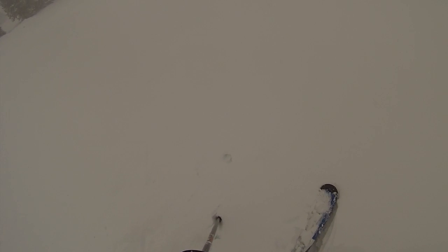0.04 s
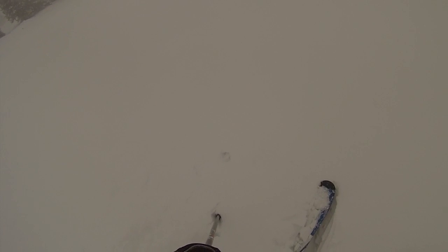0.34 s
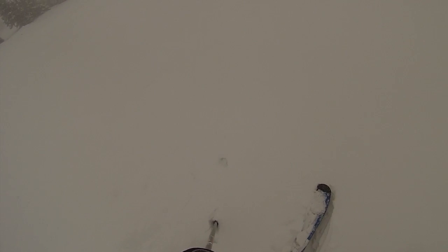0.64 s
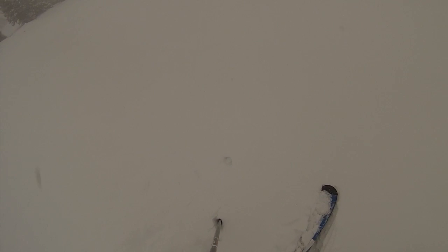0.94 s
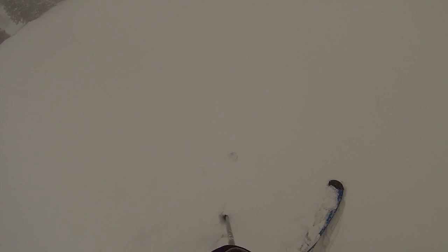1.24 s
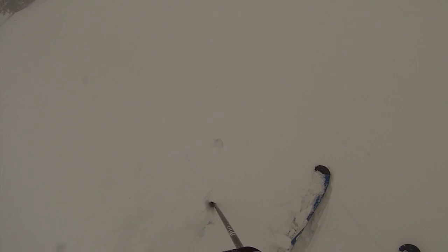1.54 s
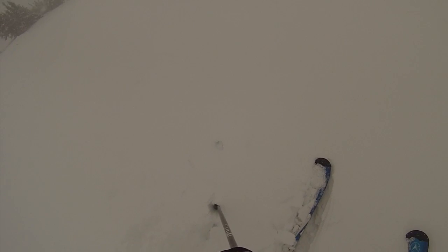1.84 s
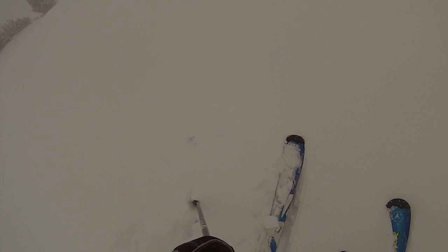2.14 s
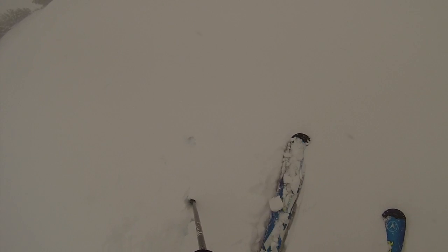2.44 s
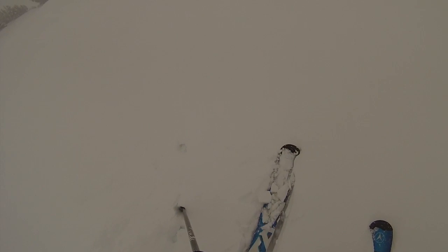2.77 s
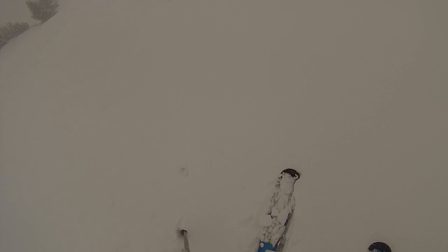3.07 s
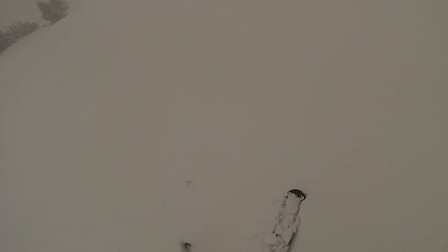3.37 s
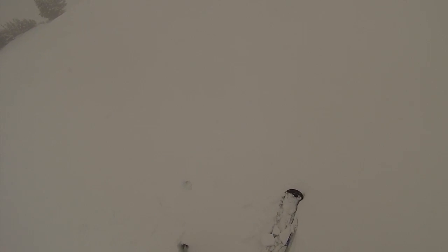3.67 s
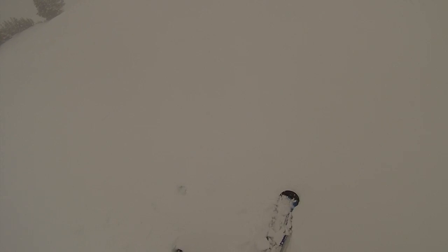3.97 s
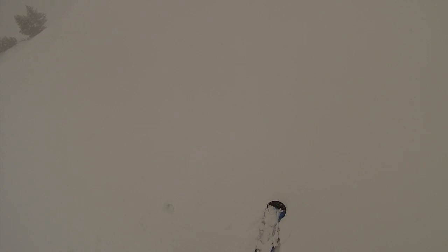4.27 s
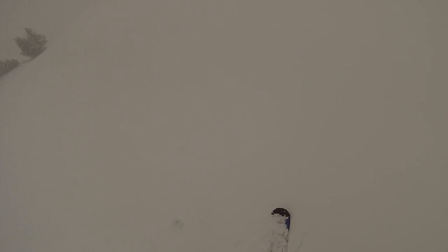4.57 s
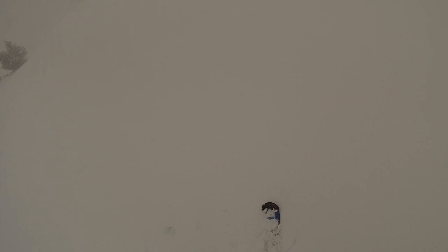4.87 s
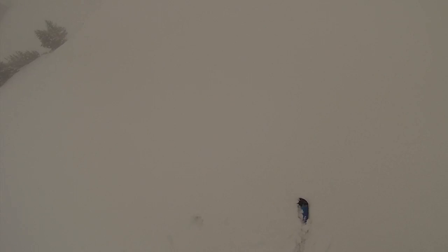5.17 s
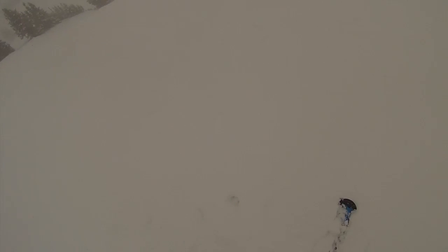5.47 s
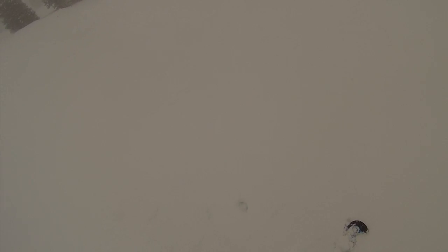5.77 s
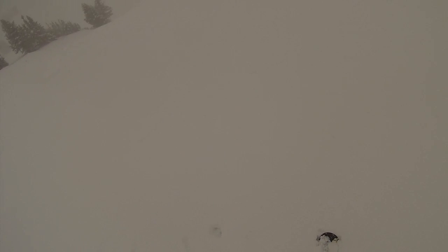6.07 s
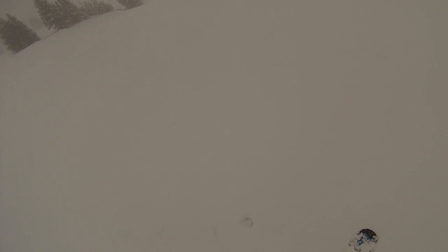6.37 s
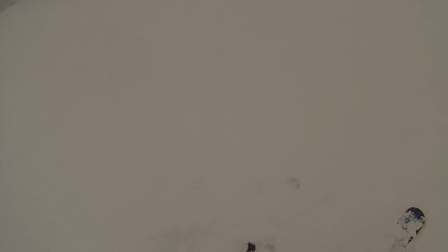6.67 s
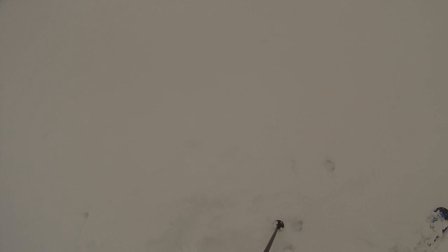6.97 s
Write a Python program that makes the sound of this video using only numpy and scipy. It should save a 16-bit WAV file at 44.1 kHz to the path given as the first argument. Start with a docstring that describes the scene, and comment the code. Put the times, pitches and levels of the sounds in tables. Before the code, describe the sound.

Low wind rumble and sharp little ticks on a body-worn camera, over the soft, muffled rush of skis turning in powder.

```python
"""A soft rush of skis in deep powder, swelling in each turn, heard from a body-worn camera's closed case.
The snow sounds through the case's resonances; grains tick on the shell and gear knocks against it.
Wind rumbles on the case; bumps in the run push it and set its mount ringing. A soft hiss lies behind.
All mono, except for the faint self-noise of the two microphones."""
import sys
import numpy as np
from scipy import signal
from scipy.fft import rfft, irfft
from scipy.io import wavfile
from scipy.ndimage import uniform_filter1d

SR = 44100
rng = np.random.default_rng(int(sys.argv[2]) if len(sys.argv) > 2 else 0)


def int16_out(signal):
    """Quantize to a 16-bit WAV file."""
    q = np.round(np.clip(np.atleast_2d(signal).T, -1, 1) * 32767)
    wavfile.write(sys.argv[1], SR, q.astype(np.int16))


N = 313992

# air stream on the case: t/s, rumble/dB, mount shake/dB
AIR_STREAM = [(0, -55.5, -70), (.22, -45, -60), (.4, -59, -69.5), (.65, -46, -73), (.92, -51, -66.5),
              (1.45, -49, -58), (1.75, -43, -72.5), (2.2, -49, -64.5), (2.85, -55, -67.5),
              (3.3, -51.5, -65.5), (3.55, -51.5, -64), (3.76, -46, -60), (4.05, -46.5, -60),
              (4.38, -52, -55.5), (4.55, -36.5, -63.5), (4.65, -42.5, -56.5), (4.78, -41, -53),
              (4.93, -46.5, -54.5), (5.15, -40, -62), (5.3, -45.5, -62), (5.56, -44, -53),
              (5.8, -53.5, -58.5), (6.1, -47.5, -69.5), (6.28, -49.5, -58), (7.12, -50, -63.5)]
# a weighted ski swishes through powder: t/s, length/s, level/dB, brightness/(dB/octave)
SKI_SWISHES = [(1.085, 0.23, -64, 12), (1.272, 0.3, -65, -11), (1.72, 0.3, -69, 11), (2.508, 0.42, -71, 10),
               (3.254, 0.21, -66.5, 10), (3.455, 0.16, -63, 13), (3.613, 0.24, -66, 28),
               (4.028, 0.37, -71, -3), (4.285, 0.15, -64.5, 26), (4.454, 0.395, -64.5, -4),
               (4.92, 0.26, -64, 11), (5.274, 0.29, -69, -2), (5.589, .11, -64, 13), (5.7, 0.21, -66.5, 11),
               (6.3, 0.37, -67, -8), (6.977, 0.3, -65.5, -26)]
# case resonances rung by spray: f/Hz, width/Hz, gain/dB
SPRAY_RESONANCES = [(2180, 210, -6), (2320, 1170, -14.5), (885, 280, -26)]


def skis(spray_trim_db=-3.0, plough_trim_db=-4.0, speed_follow=0.15):
    """Snow glides, sprays, is ploughed and packs under the skis, coloured by the case."""
    # heaps shoved aside: t/s, length/s, level/dB
    heaps = [(1.57, 0.22, -68.5), (1.95, 0.08, -62.5), (3.05, 0.3, -63.5), (4.38, 0.24, -62),
             (4.63, 0.16, -63), (4.96, 0.237, -60), (5.7, 0.31, -65), (6.2, 0.42, -65)]
    # snow packing under a ski: t/s, length/s, level/dB
    packs = [(3.69, 0.086, -67.5), (3.78, 0.12, -68), (4.42, 0.18, -72.5), (4.96, 0.26, -84)]
    # case resonances rung by ploughing: f/Hz, width/Hz, gain/dB
    plough_modes = [(195.6, 124, 3.5), (378, 49, 0), (610, 840, -11.5)]
    # resonances of packing snow: f/Hz, width/Hz, gain/dB
    pack_modes = [(910, 540, 5), (530, 240, -11.5)]
    furrow = from_db(-69.0 + speed_follow * airflow_db())
    plough_db = summed_db(furrow, arches(heaps, roundness=0.15))
    pack_db = summed_db(arches(packs, roundness=0.54))
    return (glide() + crunch(spray_db() + spray_trim_db, SPRAY_RESONANCES)
            + crunch(plough_db + plough_trim_db, plough_modes) + crunch(pack_db, pack_modes))


def glide(speed_follow=0.32, pivot_hz=1480):
    """Coasting plus a swell per swish; bright swishes favour the higher resonances."""
    # case resonances rung by gliding: f/Hz, width/Hz, gain/dB
    modes = [(1365, 153, -4), (1541, 135, -4.5), (1568, 320, -7)]
    out, coast = 0, from_db(-73.0 + speed_follow * airflow_db())
    for hz, width_hz, db in modes:
        octaves = np.log2(hz / pivot_hz)
        rows = [(s, length_s, level + bright * octaves) for s, length_s, level, bright in SKI_SWISHES]
        swish = arches(rows, roundness=0.14)
        out += crunch(summed_db(coast, swish) + db, [(hz, width_hz, 0)], flutter_db=2.5)
    return out


def crunch(level_db, modes, flutter_db=2.0, expand=0.21):
    """Breaking crystals ring the modes: near silent under light pressure, crushed under hard."""
    expanded_db = level_db + expand * (level_db - level_db.max())
    gain = from_db(expanded_db + flutter_db * drift(rate_hz=110))
    crystals = body(lambda: grains(per_s=6000, spread_db=4.5), modes)
    return gain * steady(crystals, window_s=0.045)


def spray_db(speed_follow=0.5):
    """Level of loose snow: a little while coasting, more in each swish."""
    coast = from_db(-75.5 + speed_follow * airflow_db())
    swish = arches([row[:3] for row in SKI_SWISHES], roundness=0.42)
    return summed_db(coast, from_db(-9.5) * swish)


def edge_bites(attack_s=0.0076, release_s=0.057):
    """A biting edge throws a soft jet of spray."""
    # jets: t/s, hold/s, f/Hz, width/Hz, level/dB
    jets = [(.955, 0.068, 2270, 380, -68), (3.683, 0.031, 2400, 625, -64), (3.785, .033, 2330, 620, -75),
            (4.414, 0.26, 2140, 620, -66.5), (4.982, .042, 2200, 620, -65), (4.988, 0.017, 4800, 4000, -70),
            (5.056, 0.081, 2200, 620, -77), (5.585, 0.16, 2120, 420, -71)]
    out, rush = 0, white()
    for s, hold_s, hz, width_hz, db in jets:
        t = np.arange(N) / SR - s
        rise = np.clip(t / attack_s, 0, 1)
        release = np.exp(-np.maximum(t - attack_s - hold_s, 0) / release_s)
        out += from_db(db) * rise * release * body(lambda: rush, [(hz, width_hz, 0)])
    return out


def clods(width_hz=380):
    """A clod breaks under a ski, ringing the case at its own pitch and in the spray resonances."""
    # breaks: t/s, length/s, low ring f/Hz, low ring/dB, upper ring/dB
    breaks = [(0.955, 0.12, 1370, -64, -74), (1.237, 0.033, 1500, -59, -81),
              (1.384, 0.018, 1410, -59.5, -65), (1.437, 0.017, 1400, -66, -61),
              (1.983, .054, 1470, -65, -68), (2.27, 0.017, 1480, -65, -62), (2.315, .05, 1490, -74, -77),
              (4.43, 0.028, 1490, -54.5, -61.5), (4.679, 0.028, 1450, -55, -69),
              (4.782, .018, 1500, -65, -64), (4.842, 0.02, 1480, -61, -67), (5.167, .021, 1480, -59.5, -67),
              (6.986, 0.033, 1390, -64, -65.5)]
    out, rush = 0, white()
    upper = steady(body(white, SPRAY_RESONANCES), window_s=0.04)
    for s, length_s, hz, low_db, upper_db in breaks:
        low = steady(body(lambda: rush, [(hz, width_hz, 0)]), window_s=0.037)
        pressure = arches([(s, length_s, 0)], roundness=0.74)
        out += pressure * (from_db(low_db) * low + from_db(upper_db) * upper)
    return out


def firm_snow():
    """Firmer snow shakes the case into a brief drone."""
    # firm patches: t/s, length/s, level/dB
    patches = [(3.06, 0.072, -67.5), (4.245, 0.025, -64), (4.4, .07, -65.5), (4.49, .08, -69),
               (4.68, 0.12, -64.5), (4.98, .05, -61), (5.15, .06, -72), (6.74, 0.087, -73)]
    # low case resonance: f/Hz, width/Hz, gain/dB
    modes = [(380, 80, 0)]
    return arches(patches, roundness=0.56) * steady(body(white, modes), window_s=0.038)


def wind(rumble_trim_db=-1.5, shake_trim_db=-2.5):
    """Eddies press on the case and shake it on its mount."""
    # eddy spectrum: f/Hz, relative density/dB
    spectrum = [(4, -8), (10, -1), (18, -4.5), (28, -16.5), (40, -18.5), (58, -25.5), (75, -31), (150, -55),
                (400, -53), (1000, -100)]
    # mount resonance: f/Hz, width/Hz, gain/dB
    mount_modes = [(100, 24, 0)]
    rumble_db, shake_db = in_time(AIR_STREAM)
    eddies = noise(spectrum)
    audible = butter(eddies, 20, "high", order=4)
    audible_rms = np.sqrt(uniform_filter1d(audible ** 2, size=6000) + 1e-6)
    rumble = from_db(rumble_db + rumble_trim_db) * eddies / audible_rms
    mount = steady(body(white, mount_modes), window_s=0.15)
    return rumble + from_db(shake_db + shake_trim_db) * mount


def airflow_db():
    """Air stream level about its mean; stands for the speed of the run."""
    rumble_db, _ = in_time(AIR_STREAM)
    return rumble_db - rumble_db.mean()


def bumps(lag_s=0.0311, mount_hz=102, case_hz=390, rise_s=0.003, decay_s=0.024):
    """A jolt rings the mount and, faintly, the case; a slow push of air crests just after."""
    # jolts: t/s, push f/Hz, push/dB, ring/dB
    jolts = [(0.06, 27.4, -31.5, -54), (1.049, 31, -35, -47), (1.597, 2.7, -61, -40), (3.071, 24, -34, -49),
             (4.042, 9.5, -33, -50), (4.464, 46, -49, -62), (4.717, 16, -26.5, -51),
             (4.993, 18.4, -20, -27), (5.311, 54, -35, -47.5), (5.512, 41, -35, -72),
             (6.231, 4.6, -37, -41), (6.271, 7.5, -42, -45.5)]
    out, t = np.zeros(N), np.arange(9000) / SR
    ring = np.sin(2 * np.pi * mount_hz * t) + from_db(-27) * np.sin(2 * np.pi * case_hz * t)
    ring *= np.exp(-t / decay_s) * (1 - np.exp(-t / rise_s))
    for s, hz, push_db, ring_db in jolts:
        # one pressure crest between two shallow troughs
        phase_sq = (np.pi * hz * (np.arange(N) / SR - s - lag_s)) ** 2
        out += from_db(push_db) * (1 - 2 * phase_sq) * np.exp(-np.minimum(phase_sq, 50))
        add(out, s, from_db(ring_db) * ring)
    return out


def gear_knocks(upper_hz=2330, thud_hz=600):
    """Gear strikes the case: a low and an upper ring over a dull thud."""
    # blows: t/s, f/Hz, level/dB, relative upper ring/dB, relative thud/dB
    blows = [(0.06, 1480, -47, -7, -7), (.102, 1520, -53, -2, -14), (.2046, 1500, -53, -7, -14),
             (0.3182, 1590, -50.5, -7, -10), (.477, 1330, -52, -12, -7), (0.6012, 1460, -52, -4, -16),
             (1.0097, 1330, -51, -7, -20), (1.416, 1400, -54, -12, -16), (1.564, 1750, -51.5, -5, -14),
             (1.647, 1400, -55.5, 2, -10), (6.9013, 1570, -50, -7, -12), (6.9175, 1490, -52.5, -2, -12)]
    out, t = np.zeros(N), np.arange(1500) / SR
    for s, hz, db, upper_db, thud_db in blows:
        upper = from_db(upper_db) * ping(t, upper_hz, cycles=3.4)
        thud = from_db(thud_db) * ping(t, thud_hz, cycles=0.78)
        add(out, s, from_db(db) * (ping(t, hz, cycles=2.36) + upper + thud))
    return out


def grain_ticks(crack_db=-5.5, crumble_s=0.0023):
    """A snow grain rings the spot it hits and crumbles with a faint crack."""
    # largest grains: t/s, f/Hz, decay/cycles, level/dB
    large_grains = [(.0972, 10460, 5, -61), (.1447, 9120, 2.5, -59), (.5103, 5270, 1.4, -49),
                    (0.72, 4010, 2.3, -55), (0.7236, 5160, 3, -49), (.8651, 5270, 5, -58),
                    (1.0103, 6940, 4, -55), (1.011, 3550, 2, -51), (1.0259, 2370, 2.9, -52),
                    (1.4177, 11100, 5, -51), (1.4308, 11210, 2.5, -60), (1.445, 5000, 1.3, -51),
                    (1.6066, 6480, 5, -55), (1.6638, 10460, 5, -61), (1.6876, 5240, 2.5, -55),
                    (1.7125, 4010, 1, -50), (1.72, 2180, 2.5, -47.5), (1.72, 11210, 1.2, -53),
                    (2.2756, 6900, 5.1, -57), (2.4323, 4460, 6, -48.5), (2.433, 9100, 1.2, -51),
                    (2.6488, 4920, 2.5, -54), (2.7636, 9770, 1.2, -54), (3.0464, 9120, 2.5, -58),
                    (3.1173, 7400, 2.3, -54), (3.1556, 4630, 5, -57), (3.1562, 12000, 1.2, -54),
                    (3.253, 2340, 2.3, -54), (3.3377, 3240, 0.93, -48.5), (3.423, 3490, 2.2, -49),
                    (3.4266, 4920, 1.1, -50), (3.4958, 6050, 1.2, -53), (3.9488, 4290, 1.5, -53),
                    (3.958, 5200, 2, -53), (3.9796, 9000, 5, -57), (4.6498, 3260, 4, -55),
                    (4.65, 7430, 5, -55.5), (4.8529, 3490, 2.5, -51.5), (4.9891, 4290, 2.5, -52),
                    (5.02, 7950, 3, -54), (5.3105, 7950, 2.5, -52), (5.3248, 6940, 1.2, -53),
                    (5.5028, 4500, 1.3, -41.5), (5.6641, 11100, 5, -55), (5.934, 10460, 2.5, -62),
                    (6.127, 9770, 1.2, -61), (6.3945, 4580, 2.5, -52), (6.4757, 2220, 2.6, -44.5),
                    (6.4773, 7500, 1.6, -53), (6.4864, 6480, 2.5, -56), (6.5231, 6940, 2.5, -51),
                    (6.562, 11210, 1.2, -57), (6.5718, 6050, 1.2, -54), (6.634, 5650, 1.3, -47.5),
                    (6.8826, 7430, 2.5, -57), (6.9243, 9770, 1.2, -57), (6.9246, 3320, 1.9, -51)]
    out, t = np.zeros(N), np.arange(900) / SR
    for s, hz, cycles, db in large_grains + stray_grains():
        tone = ping(t, hz, cycles)
        contact = rng.standard_normal(len(t)) * np.exp(-t / crumble_s)
        crack = shell_crack(contact, hz)
        crack *= np.linalg.norm(tone) / np.linalg.norm(crack)
        add(out, s, from_db(db) * (tone + from_db(crack_db) * crack))
    return out


def shell_crack(contact, hz):
    """The plastic shell cracks; big soft lumps that ring low also crack dully."""
    crack = butter(contact, 0.3 * hz, "high", order=1)
    crack = butter(crack, np.clip(1.5 * hz, 6000, 10500), "low")
    return crack + 0.28 * resonate(crack, 3700, 1100) + 1.1 * resonate(crack, 11400, 900)


def stray_grains(count=24, low_hz=3500, high_hz=12000, cycles=2.2, db_per_octave=-2.5, spread_db=5.0):
    """Smaller grains hit at random, higher ones fainter: t/s, f/Hz, decay/cycles, level/dB."""
    jitter, spot, size = rng.uniform(0, 1, (count, 3)).T
    times_s = (np.arange(count) + jitter) / count * (N - 1) / SR
    hz = low_hz * (high_hz / low_hz) ** spot
    db = -59.5 + db_per_octave * np.log2(hz / low_hz) + spread_db * (2 * size - 1)
    return list(zip(times_s, hz, np.full(count, cycles), db))


def flurry(base_per_s=70, gain_db=-36.5, db_per_octave=-3.5, width_hz=900, spray_follow=0.94):
    """Fine grains patter on the shell, each spot at its own pitch; denser with more spray."""
    loose_db = spray_db()
    per_s = base_per_s * from_db(spray_follow * (loose_db - loose_db.mean()))
    spots_hz = np.geomspace(2000, 11000, num=12)
    gains = from_db(gain_db + db_per_octave * np.log2(spots_hz / spots_hz[0]))
    return sum(gain * resonate(grains(per_s / len(spots_hz), spread_db=2.0), hz, width_hz)
               for hz, gain in zip(spots_hz, gains))


def background_hiss(floor_db=-63.0, waver_db=0.5, swell_db=-73, period_s=0.96, crest_s=0.47):
    """A steady soft hiss and a thin one swelling about once a second."""
    # soft hiss: f/Hz, relative density/dB
    soft_spectrum = [(60, 9.5), (150, 7), (300, 5), (500, 3), (900, 0), (1800, -3), (2700, -4), (3400, -8),
                     (5000, -10), (7000, -14), (9600, -20), (11000, -17.5), (12500, -21.5), (14500, -34.5)]
    # thin hiss: f/Hz, relative density/dB
    thin_spectrum = [(2000, -9), (2500, -3.5), (2790, 4), (3100, -10), (6000, -30), (9700, -23),
                     (10250, -9), (11000, -21), (13000, -32)]
    soft = from_db(floor_db + waver_db * drift(rate_hz=14)) * noise(soft_spectrum)
    swell = np.cos(np.pi * (np.arange(N) / SR - crest_s) / period_s) ** 2
    return soft + from_db(swell_db) * swell * noise(thin_spectrum)


def microphones(level_db=-75.5):
    """Independent self-noise, left and right."""
    # self-noise: f/Hz, relative density/dB
    spectrum = [(100, -38), (220, -7.5), (500, -3.5), (3000, -4), (6000, -6), (9500, -10), (11000, -17.5),
                (14000, -34)]
    return from_db(level_db) * np.array([noise(spectrum), noise(spectrum)])


def from_db(db):
    """Decibels to gain."""
    return 10 ** (np.asarray(db) / 20)


def summed_db(*gains):
    """Power sum of unrelated sounds."""
    return 10 * np.log10(sum(g ** 2 for g in gains) + 1e-18)


def rms_one(x):
    """Scale to rms 1."""
    return x / np.sqrt(np.mean(x ** 2) + 1e-20)


def steady(x, window_s):
    """Even out the slow level; rms 1."""
    power = uniform_filter1d(rms_one(x) ** 2, size=int(window_s * SR))
    return rms_one(x / np.sqrt(np.abs(power) + 1e-4))


def in_time(rows):
    """Each column of a timed curve, per sample."""
    s, *columns = np.transpose(rows)
    return [np.interp(np.arange(N) / SR, s, c) for c in columns]


def add(out, s, sound):
    """Mix a sound in at s seconds."""
    start = max(0, round(s * SR))
    out[start:start + len(sound)] += sound[:N - start]


def arches(rows, roundness):
    """Gain of pressure building and easing, one arch per row: t/s, length/s, level/dB."""
    power = np.zeros(N)
    for s, length_s, db in rows:
        arch = np.sin(np.linspace(0, np.pi, int(length_s * SR)))
        add(power, s, (from_db(db) * np.abs(arch) ** roundness) ** 2)
    return np.sqrt(power)


def white():
    """White noise."""
    return rng.standard_normal(N)


def noise(spectrum):
    """Coloured noise; rms 1."""
    hz, db = np.transpose(spectrum)
    bins_hz = np.fft.rfftfreq(N, 1 / SR) + 1e-3
    gain = from_db(np.interp(np.log(bins_hz), np.log(hz), db))
    return rms_one(irfft(rfft(white()) * gain, N))


def drift(rate_hz):
    """Random wander; rms 1."""
    knots = rng.standard_normal(1000)
    return rms_one(np.interp(np.arange(N) / SR * rate_hz, np.arange(len(knots)), knots))


def grains(per_s, spread_db):
    """Random clicks of uneven size."""
    out, hits = np.zeros(N), rng.random(N) < per_s / SR
    draw = rng.uniform(-1, 1, N)[hits]
    size = np.minimum(-np.log(np.abs(draw)), 4)
    out[hits] = np.sign(draw) * from_db(spread_db * size)
    return out


def butter(x, hz, kind, order=2):
    """Butterworth filter."""
    return signal.sosfilt(signal.butter(order, hz, kind, fs=SR, output="sos"), x)


def resonate(x, hz, width_hz):
    """One resonance; peak gain 1."""
    r = np.exp(-np.pi * width_hz / SR)
    feedback = [1, -2 * r * np.cos(2 * np.pi * hz / SR), r * r]
    return signal.lfilter(np.array([1, 0, -1]) * (1 - r * r) / 2, feedback, x + 1e-18)


def body(excite, modes):
    """Steep-sided resonances, each driven by its own call of excite; rms 1."""
    return rms_one(sum(from_db(db) * resonate(resonate(excite(), hz, width_hz), hz, width_hz)
                       for hz, width_hz, db in modes))


def ping(t, hz, cycles, rise_share=0.56):
    """A spot on the case swells quickly and rings for a few cycles; peak 1."""
    age = t * hz / cycles
    wave = np.sin(2 * np.pi * hz * t) * np.exp(-age) * (1 - np.exp(-age / rise_share))
    return wave / np.abs(wave).max()


def scene():
    """All but the self-noise is alike in both channels."""
    mono = (wind() + bumps() + skis() + firm_snow() + edge_bites() + clods()
            + gear_knocks() + grain_ticks() + flurry() + background_hiss())
    return mono + microphones()


def record(dry):
    """Steep low-pass at 14.9 kHz."""
    return signal.sosfilt(signal.ellip(10, 0.1, 80, 14900, fs=SR, output="sos"), dry)


dry = scene()
out = record(dry)
int16_out(out)
```